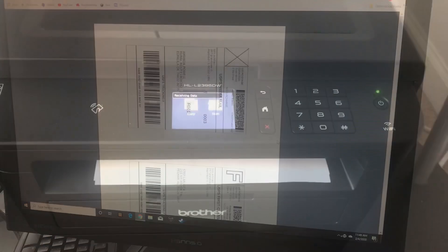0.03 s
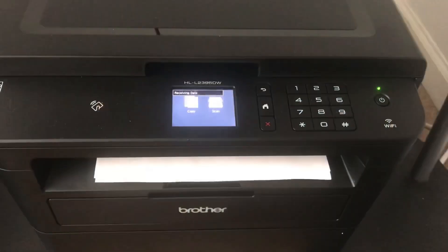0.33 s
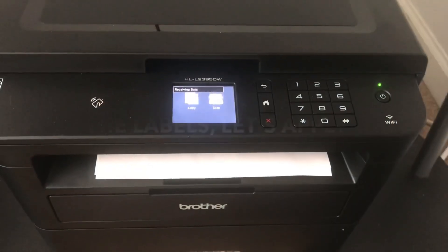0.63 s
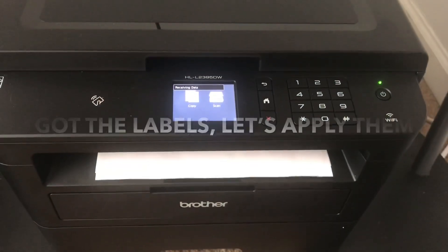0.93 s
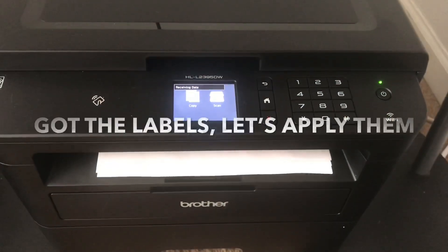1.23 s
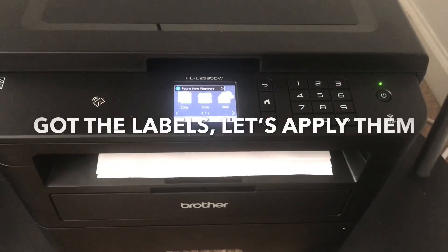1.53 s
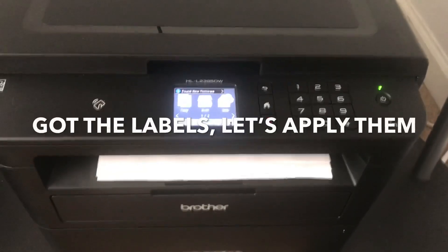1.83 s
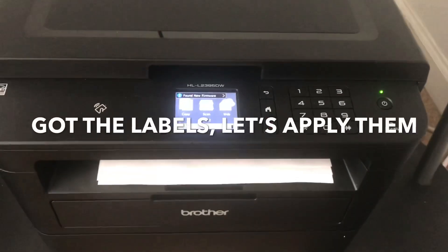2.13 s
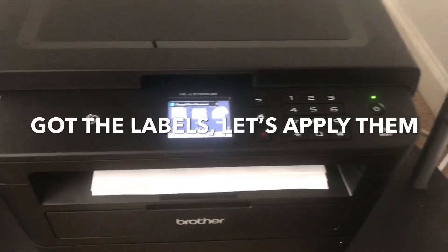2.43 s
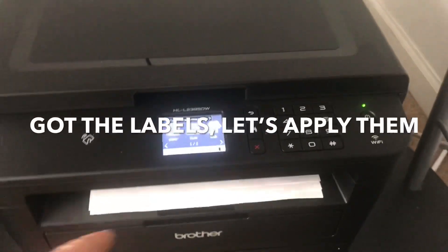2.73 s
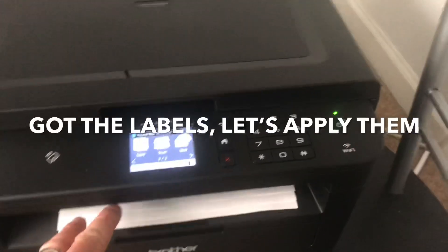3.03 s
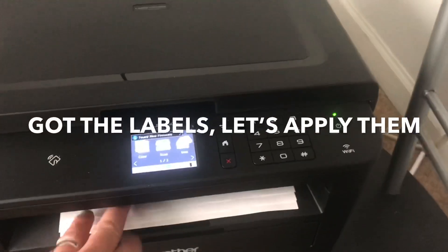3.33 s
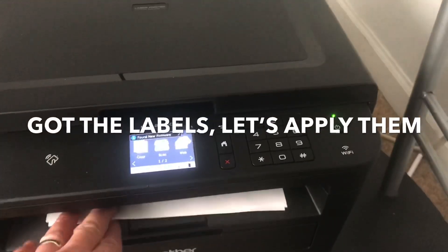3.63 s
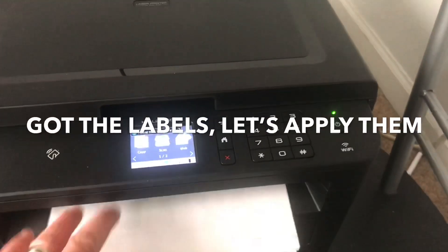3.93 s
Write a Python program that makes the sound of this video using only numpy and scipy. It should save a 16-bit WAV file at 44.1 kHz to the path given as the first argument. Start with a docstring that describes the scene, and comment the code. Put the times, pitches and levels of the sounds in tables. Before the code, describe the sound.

A printer whirs with rattling gears and clacks in a quiet room, then stops, leaving its fan running. Two sharp clicks sound close by, then a soft thud, and a hand slides paper out of the tray.

```python
"""Motor and gears whir as a laser printer ends a job in a quiet room: teeth rattle, a roller whistles,
clutches clack, knocks ring the plastic case. The drive stops at about 1.6 s; only the fan runs on.
Two sharp clicks (fast downward chirps) sound close by, then a soft thud. A hand bumps the output tray
and slides the sheets out; they rub and squeak."""
import sys
import numpy as np
from scipy import signal
from scipy.fft import rfft, irfft, next_fast_len
from scipy.io import wavfile

SR = 44100
rng = np.random.default_rng(int(sys.argv[2]) if len(sys.argv) > 2 else 0)


def generate_wav(sig):
    """Save sig (samples, or channels by samples) to the path in sys.argv[1] as 16-bit PCM at SR."""
    pcm = np.round(np.clip(np.atleast_2d(sig).T, -1, 1) * 32767).astype(np.int16)
    wavfile.write(sys.argv[1], SR, pcm)


N = 176400
T = np.arange(N) / SR

IMPACT_CONTACTS_PER_S, IMPACT_HISS = 2500, 0.16
FIBRES_PER_S, FIBRE_HISS = 1800, 0.65


def from_db(db):
    """Decibels to gain."""
    return 10 ** (np.asarray(db) / 20)


def rms_one(x):
    """Scale to unit power."""
    return x / np.sqrt(np.mean(x ** 2) + 1e-20)


def level(rows):
    """Gain over time from (s, dB) points."""
    return from_db(np.interp(T, *np.transpose(rows)))


def drift(points_per_s):
    """Unit-power curve through random points."""
    return rms_one(np.interp(T * points_per_s, np.arange(2000), rng.standard_normal(2000)))


def colour(x, spectrum, tilt_db_per_oct=0):
    """Causal filter of unit power gain along tilted (Hz, dB) points."""
    size = next_fast_len(N + SR // 4)
    octave = np.log2(np.maximum(np.fft.rfftfreq(size, 1 / SR), 1))
    hz, db = np.transpose(spectrum)
    low_cut_db = 12 * np.minimum(octave - np.log2(hz[0]), 0)
    gain = rms_one(from_db(np.interp(octave, np.log2(hz), db) + tilt_db_per_oct * octave + low_cut_db))
    cepstrum = irfft(np.log(gain), size)
    cepstrum[1:size // 2] *= 2  # fold for minimum phase
    cepstrum[size // 2 + 1:] = 0
    return irfft(rfft(x, size) * np.exp(rfft(cepstrum)), size)[:N]


def ring(x, hz, t60_s):
    """One decaying mode, driven by x."""
    radius, angle = from_db(-60 / (t60_s * SR)), 2 * np.pi * hz / SR
    zeros = np.sqrt((1 - radius ** 2) / 2) * np.array([1, 0, -1])
    return signal.lfilter(zeros, [1, -2 * radius * np.cos(angle), radius ** 2], x + 1e-18)


def grains(per_s, hiss):
    """Tiny random contacts over smooth friction noise."""
    contacts = (rng.random(N) < per_s / SR) * rng.choice([-1, 1], N) * rng.uniform(0.51, 1, N)
    return rms_one(rms_one(contacts) + hiss * rng.standard_normal(N))


def tone(hz, wander, flutter_db):
    """Unit-power sine, unsteady in pitch and level."""
    cycles = np.cumsum(hz * (1 + wander * drift(20))) / SR + rng.random()
    return rms_one(np.sin(2 * np.pi * cycles) * from_db(flutter_db * drift(14)))


def bursts(rows, spectrum, per_s, hiss):
    """Runs of contacts that build and decay, each with its own treble tilt."""
    out = np.zeros(N)
    for start_s, db, rise_s, decay_s, tilt_db_per_oct in rows:
        attack = np.clip((T - start_s) / rise_s, 0, 1)
        decay = np.exp(-np.maximum(T - start_s - rise_s, 0) / decay_s)
        out += from_db(db) * colour(attack * decay * grains(per_s, hiss), spectrum, tilt_db_per_oct)
    return out


def swell(age_s, peak_s, power=1):
    """Rounded pulse, height 1 at peak_s."""
    return (age_s / peak_s * np.exp(1 - age_s / peak_s)) ** power


def damped_note(start_s, db, hz, peak_s):
    """A vibration that swells and dies: a thud when low, a squeak when high."""
    age_s = np.maximum(T - start_s, 0)
    return -from_db(db) * swell(age_s, peak_s) * np.sin(2 * np.pi * hz * age_s)


def gear_train():
    """Gear teeth rattle in the case, with motor and gear tones and a thin whine."""
    # Each row: time in seconds, level in dB.
    drive_levels = [(0, -38), (.15, -35.5), (.2, -32.5), (1.5, -34), (1.565, -30.5), (1.6, -48.5),
                    (1.72, -51.5), (1.8, -56)]
    # Each row: frequency in Hz, relative density in dB.
    gear_spectrum = [(30, -48), (70, 3.5), (115, -3), (260, 6), (370, 0), (600, -0.5), (1250, 0),
                     (1900, -8), (2600, -14), (3100, -18), (4500, -21.5), (6500, -29), (7600, -35),
                     (9200, -36), (10500, -44.5), (16000, -48)]
    # Each row: frequency in Hz, level at full drive in dB.
    gear_tones = [(204.6, -54), (333.8, -51.5), (409.1, -54), (560, -47.5), (613, -46.5), (842, -49.5),
                  (974.5, -68), (1022.6, -48.5), (1226.3, -51.5), (1299.3, -45)]
    full_drive_db = -33.5
    whine_hz, whine_width_hz, whine_at_full_db = 11830, 200, -75.5
    mesh = rms_one(rng.standard_normal(N) + 0.34 * grains(per_s=500, hiss=0))
    rattle = colour(mesh, gear_spectrum)
    tones = sum(from_db(db) * tone(hz, wander=.002, flutter_db=2) for hz, db in gear_tones)
    whine_t60_s = np.log(1000) / np.pi / whine_width_hz
    whine = from_db(whine_at_full_db) * rms_one(ring(rng.standard_normal(N), whine_hz, whine_t60_s))
    return level(drive_levels) * (rattle + (tones + whine) / from_db(full_drive_db))


def roller_whistle(hz=2295, db=-51.5, end_s=0.66, fade_s=0.19):
    """A roller whistles until the last sheet is through."""
    return from_db(db) * tone(hz, wander=.002, flutter_db=-0.5) * np.clip((end_s - T) / fade_s, 0, 1)


def motor_hum(stop_s=1.72):
    """The main motor's hum swells and dips over a lower hum."""
    # Each row of both: time in seconds, level in dB.
    main_levels = [(0, -35.5), (.15, -38), (.185, -61), (.33, -39), (.47, -39), (.545, -27.5), (.63, -32),
                   (.68, -71), (.73, -30), (.835, -28.5), (.885, -42.5), (1.01, -36), (1.27, -28.5),
                   (1.335, -35), (1.39, -30.5), (1.555, -35), (1.6, -55)]
    low_levels = [(0, -46.5), (.17, -35.5), (.45, -41), (1.56, -45), (1.6, -55)]
    main = level(main_levels) * tone(hz=260.7, wander=0.0086, flutter_db=0.8)
    low = level(low_levels) * tone(hz=167.3, wander=0.0095, flutter_db=2)
    return (main + low) * (T < stop_s)


def fan(rush_db=-48):
    """Cooling fan: a steady rush of air and wavering tones."""
    # Each row: frequency in Hz, relative density in dB.
    rush_spectrum = [(35, -7.5), (70, 3), (125, -1.5), (155, -10.5), (275, -1.5), (400, -14), (950, -27.5),
                     (1400, -26.5), (2000, -26.5), (3000, -30), (4400, -33), (5000, -36.5), (6500, -36),
                     (10400, -42), (12000, -39.5), (16000, -45.5)]
    # Each row: frequency in Hz, level in dB.
    fan_tones = [(70, -56.5), (179, -62), (223, -60.5), (268, -54), (316, -57), (899, -66), (1442.5, -64.5)]
    rush = from_db(rush_db) * colour(rng.standard_normal(N), rush_spectrum)
    return rush + sum(from_db(db) * tone(hz, wander=.004, flutter_db=1.8) for hz, db in fan_tones)


def clutch_clacks():
    """Clutches and levers strike in short runs of hard contacts."""
    # Each row: start in seconds, level in dB, rise and decay in seconds, tilt in dB per octave.
    clacks = [(.176, -30.5, 0.0014, 0.011, -0.5), (.19, -29, 0.0032, 0.012, -3.5),
              (.239, -27, 0.0017, 0.013, -5), (.393, -29, 0.001, 0.014, -3),
              (.422, -27.5, 0.0022, 0.029, 2), (.59, -21.5, 0.00045, 0.0085, 1.5),
              (.667, -25.5, 0.0018, 0.032, -3), (.905, -32.5, 0.0013, 0.0056, 1),
              (1.559, -35.5, 0.0026, 0.008, 1.5), (1.8615, -35.5, 0.00049, 0.0031, -7.5)]
    # Each row: frequency in Hz, relative density in dB.
    clack_spectrum = [(100, -20), (400, -7), (800, 2), (1500, 1.5), (2300, -3.5), (2750, -6), (3200, -12),
                      (4300, -11), (8000, -31), (16000, -50)]
    return bursts(clacks, clack_spectrum, IMPACT_CONTACTS_PER_S, IMPACT_HISS)


def case_knocks(direct_db=-3.5, cycles_to_peak=3.45):
    """Rattling blows ring the plastic case; the struck part adds its own short note."""
    # Each row: start in seconds, force in dB, rise and decay in seconds, tilt in dB per octave,
    # note pitch in Hz, note level in dB.
    knocks = [(.7888, -21, 0.00034, 0.0066, 4, 853, -28.5), (.8175, -21.5, 0.001, 0.0087, 2, 2940, -23.5),
              (.821, -20, 0.0031, 0.015, 0.5, 552, -18), (1.967, -37.5, 0.0014, 0.0034, -5.5, 560, -48),
              (3.457, -30, 0.0038, 0.021, 0, 501, -29), (3.9652, -24, 0.0092, 0.0067, .5, 1056, -24),
              (3.974, -26.5, 0.0024, 0.018, -4, 584, -23.5)]
    # Each row: frequency in Hz, relative density in dB.
    case_spectrum = [(70, -20), (200, -3), (550, 0), (1100, -1.5), (1700, -4.5), (3000, -13), (6000, -29),
                     (16000, -60.5)]
    # Each row: frequency in Hz, level relative to the force in dB, T60 in seconds.
    case_modes = [(190, -13, 0.092), (338, -23, 0.19), (755, -15.5, 0.05), (976, -14.5, 0.13),
                  (1081, -15, 0.28), (1390, -16.5, 0.029), (1980, -22, 0.049)]
    out = np.zeros(N)
    for *blow, note_hz, note_db in knocks:
        force = bursts([blow], case_spectrum, IMPACT_CONTACTS_PER_S, IMPACT_HISS)
        modes = sum(from_db(db) * rms_one(ring(force, hz, t60_s)) for hz, db, t60_s in case_modes)
        note = damped_note(blow[0], note_db, note_hz, cycles_to_peak / note_hz)
        out += from_db(direct_db) * force + np.std(force) * modes + note
    return out


def paper_slide(slips_per_s=300, slip_spread_db=1):
    """Two faint rustles, then the sheets catch, slip and squeak along the tray."""
    # Each row: start in seconds, level in dB, rise and decay in seconds, tilt in dB per octave.
    rubs = [(1.96, -60, 0.04, 0.087, 2.5), (2.37, -55, 0.044, 0.074, -2.5), (3.492, -43, 0.012, 0.015, 1),
            (3.52, -59, .03, 0.33, 2.5), (3.69, -44.5, 0.055, 0.077, -1),
            (3.765, -38.5, 0.021, 0.026, -1.5), (3.805, -44.5, 0.023, 0.016, 4)]
    # Each row: frequency in Hz, relative density in dB.
    paper_spectrum = [(150, -19), (600, -2), (1450, 2), (2400, 2.5), (2900, -1), (4150, 0), (4800, -8),
                      (6500, -6), (7500, -14), (9200, -11.5), (10400, -18.5), (16000, -24)]
    # Each row: start in seconds, level in dB, pitch in Hz, time to peak in seconds.
    squeaks = [(3.499, -44, 3500, 0.0026), (3.611, -46, 3570, 0.0021)]
    grip = np.interp(T * slips_per_s, np.arange(N), rng.standard_normal(N))
    slip_gain = rms_one(from_db(-slip_spread_db * grip))
    friction = bursts(rubs, paper_spectrum, FIBRES_PER_S, FIBRE_HISS)
    return slip_gain * friction + sum(damped_note(*row) for row in squeaks)


def soft_thuds():
    """Damped low vibrations and a dull scuff, like a foot on carpet."""
    # Each row: start in seconds, level in dB, pitch in Hz, time to peak in seconds.
    thuds = [(1.971, -32, 72.5, 0.0034), (2.621, -44, 645, 0.0044), (2.642, -35, 227, 0.01),
             (2.665, -31, 185, 0.0057), (3.505, -25.5, 120, 0.0024)]
    # Each row: start in seconds, level in dB, rise and decay in seconds, tilt in dB per octave.
    scuffs = [(2.624, -37, 0.018, 0.025, 0)]
    # Each row: frequency in Hz, relative density in dB.
    scuff_spectrum = [(110, -5), (300, 0), (700, -20.5), (16000, -100)]
    scuff = bursts(scuffs, scuff_spectrum, FIBRES_PER_S, FIBRE_HISS)
    return sum(damped_note(*row) for row in thuds) + scuff


def close_clicks(sweep_hz=7720, crack_db=-42.5, hollow_hz=1800, thump_lag_s=0.0024):
    """Each click arrives treble first: a tiny crack and falling chirp, a hollow ring, a low thump."""
    # Each row: start in seconds, chirp level in dB, end pitch in Hz, pitch fall time and time to peak
    # in seconds, leading tick in dB relative to the chirp, ring and thump levels in dB.
    clicks = [(2.3195, -27.5, 635, 0.00075, 0.0021, -10.5, -25.5, -27.5),
              (2.3493, -15.5, 430, 0.000568, .0018, -20, -32, -24)]
    out = np.zeros(N)
    for start_s, db, end_hz, fall_s, peak_s, tick_db, hollow_db, thump_db in clicks:
        age_s = np.maximum(T - start_s, 0)
        cycles = end_hz * age_s + sweep_hz * fall_s * (1 - np.exp(-age_s / fall_s))
        envelope = swell(age_s, peak_s, power=6.7) + from_db(tick_db) * swell(age_s, fall_s / 2)
        chirp = from_db(db) * envelope * np.sin(2 * np.pi * cycles)
        crack = from_db(crack_db) * swell(age_s, peak_s=0.0002) * rng.standard_normal(N)
        hollow = damped_note(start_s, hollow_db, hollow_hz, peak_s=1 / hollow_hz)
        thump = damped_note(start_s + thump_lag_s, thump_db, hz=117, peak_s=0.0023)
        out += chirp + crack + hollow + thump
    return out


def room(x, t60_s=0.39, wet_db=-16.5, gap_s=.005):
    """A small furnished room adds a dull tail of reflections."""
    age_s = T[:SR // 2]
    dull_noise = signal.lfilter([1], [1, -.6], rng.standard_normal(len(age_s)))
    tail = dull_noise * from_db(-60 * age_s / t60_s) * (age_s > gap_s)
    return x + from_db(wet_db) * signal.fftconvolve(x, tail / np.linalg.norm(tail))[:N]


def scene():
    """Mono, just in front of the tray; drive, fan and close clicks stay dry."""
    contacts = clutch_clacks() + paper_slide() + soft_thuds()
    machine = gear_train() + roller_whistle() + motor_hum() + fan()
    return (machine + room(contacts + case_knocks()) + close_clicks())[None]


def record(dry):
    """Steep elliptic low-pass."""
    cutoff_hz = 15900
    return signal.sosfilt(signal.ellip(12, .1, 80, cutoff_hz, fs=SR, output="sos"), dry)


dry = scene()
out = record(dry)
generate_wav(out)
```